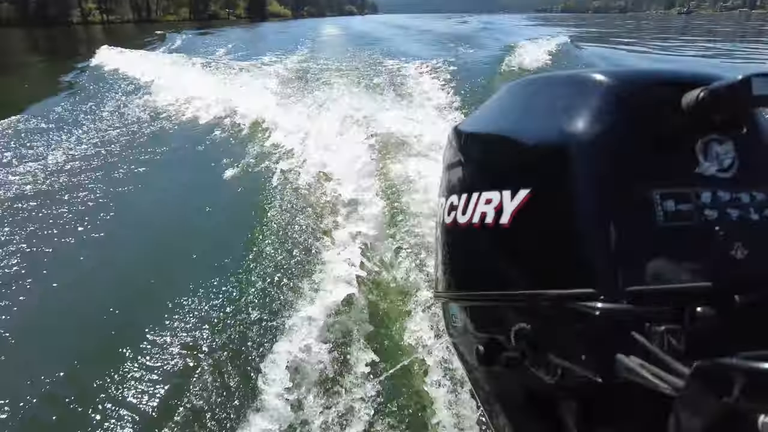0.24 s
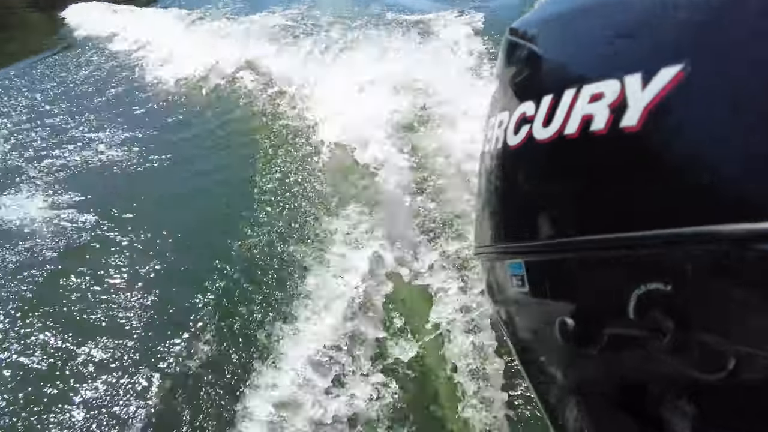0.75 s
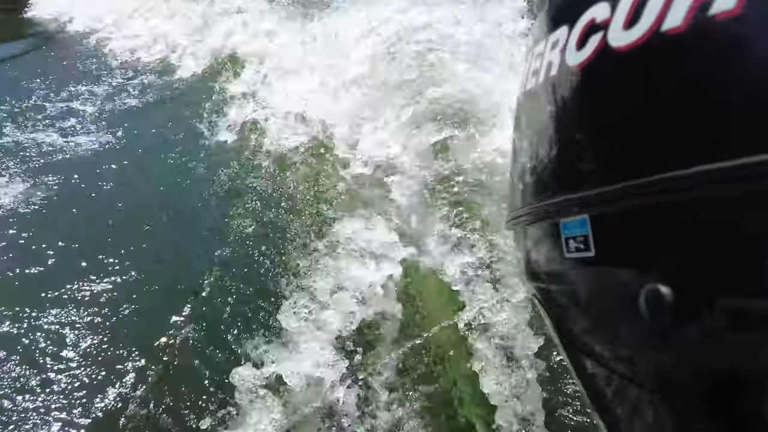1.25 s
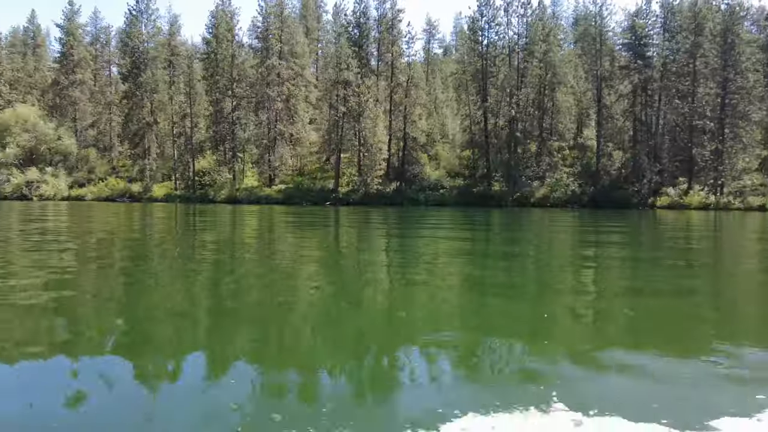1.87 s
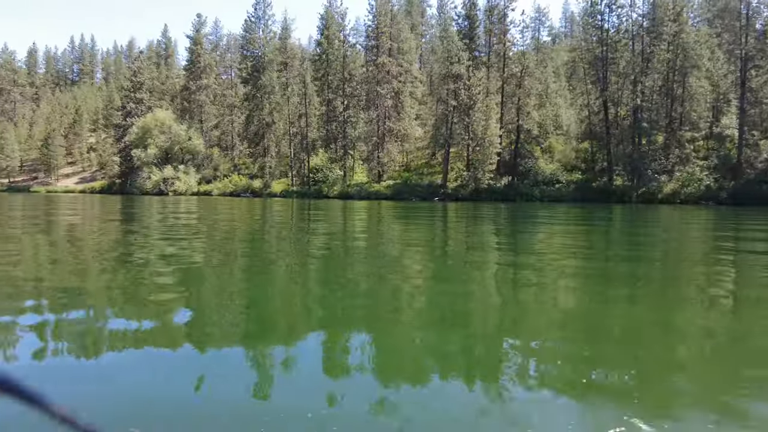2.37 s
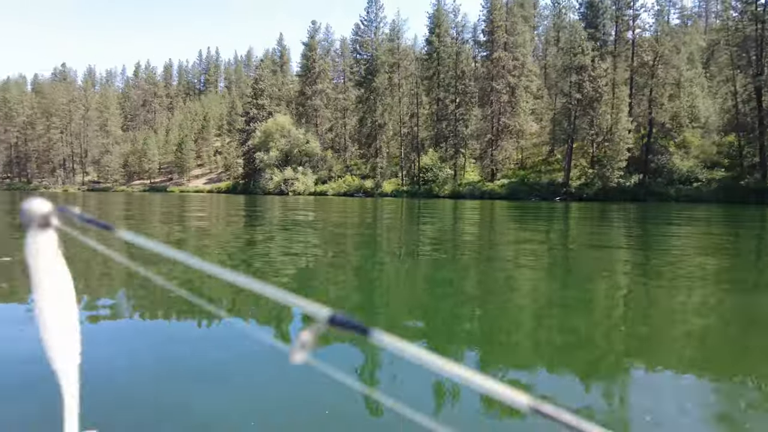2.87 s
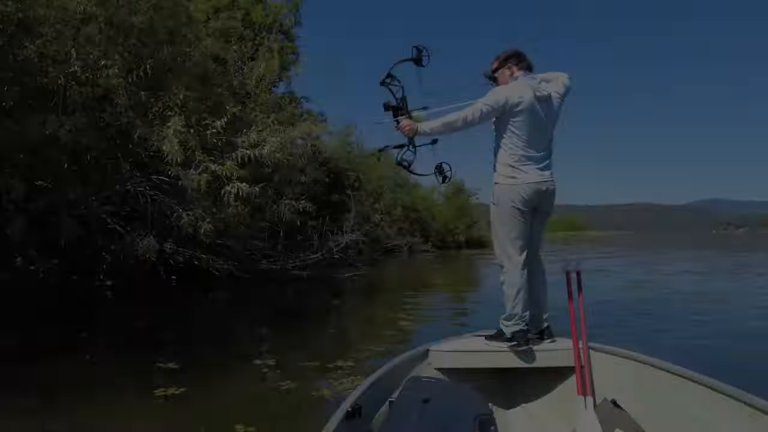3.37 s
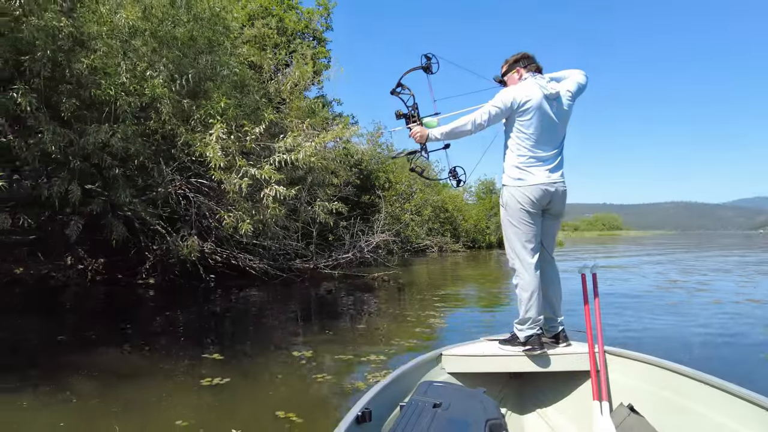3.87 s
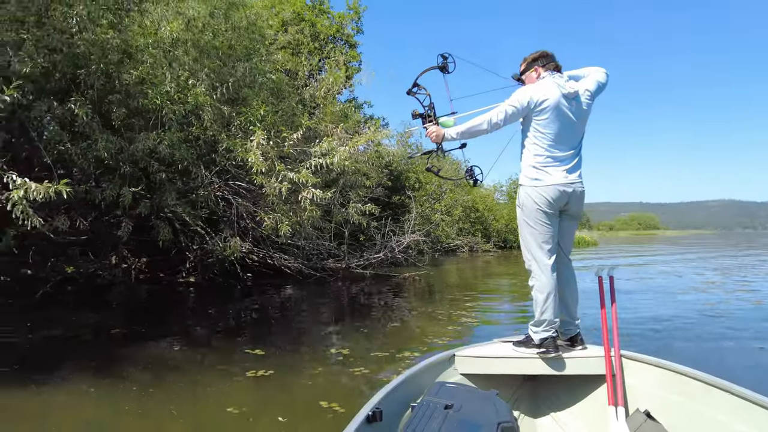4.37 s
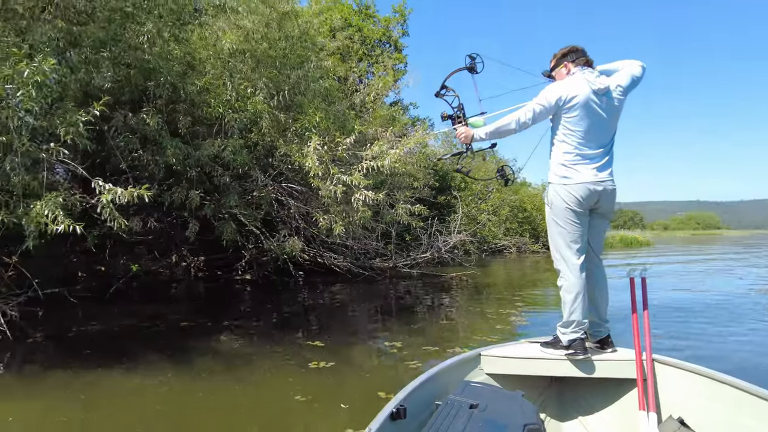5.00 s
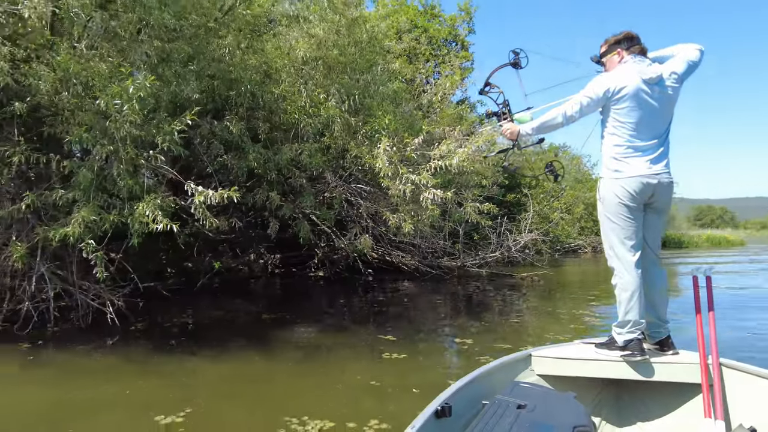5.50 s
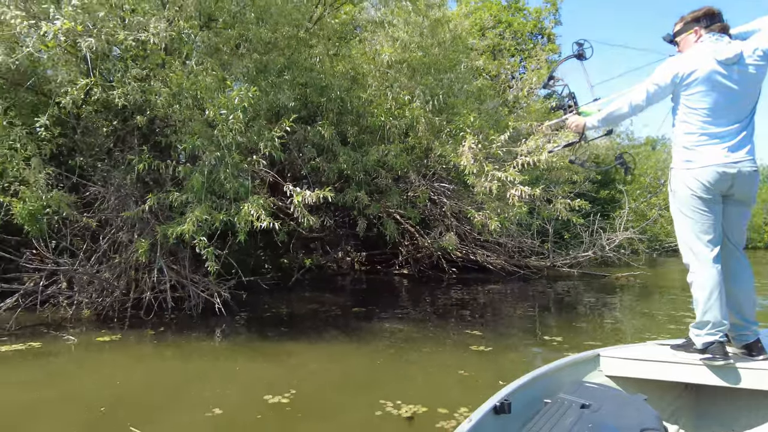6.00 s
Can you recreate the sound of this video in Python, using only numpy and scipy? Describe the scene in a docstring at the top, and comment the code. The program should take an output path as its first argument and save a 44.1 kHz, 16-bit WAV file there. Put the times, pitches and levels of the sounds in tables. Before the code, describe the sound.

A small outboard motor drones at speed over hissing spray, then cuts to a quiet lake with a brief creak and small ticks.

```python
"""A small four-stroke outboard runs at speed: a firing drone over exhaust roar, spray and a ringing cowl,
with waves thudding under the hull. It is heard close behind the cowl, then at 1.4 s from further forward.
At 3.3 s the sound is cut off, and after a blank instant comes a quiet lake. Something stiff creaks in
slips beside the microphone; gear ticks, someone shifts in the boat, wind puffs and a far motor hums.
Around 5 s an insect chirps faintly, and right at the end a bubble plops."""
import sys
import numpy as np
from scipy import signal
from scipy.fft import rfft, irfft, next_fast_len
from scipy.io import wavfile

SR = 44100
rng = np.random.default_rng(int(sys.argv[2]) if len(sys.argv) > 2 else 0)


def int16_out(signal):
    """Quantize to a 16-bit WAV file."""
    q = np.round(np.clip(np.atleast_2d(signal).T, -1, 1) * 32767)
    wavfile.write(sys.argv[1], SR, q.astype(np.int16))


N = 275524
TIME = np.arange(N) / SR

# How the drone moves, from behind the cowl and from further forward.
# Each row: time in seconds, firings per second, then the levels in dB of orders 1, 4, 6 and 7.
NEAR_FIRING = [(0.03, 68, -17.5, -19, -28.5, -59), (0.234, 69.3, -20, -17.5, -37, -45),
               (0.362, 69, -18, -17.5, -32, -43), (0.532, 68, -15.5, -19, -41, -44.5),
               (0.746, 67.9, -17.5, -20.5, -33.5, -42), (1.42, 67.0, -17, -19, -42, -36.5)]
FORWARD_FIRING = [(1.48, 71.07, -17.5, -23.5, -33.5, -51), (1.632, 71, -18, -25.5, -32, -67),
                  (1.844, 70.62, -20, -24, -30.5, -52), (3.25, 70.84, -20, -24.5, -32, -58)]
# The drone's timbre; the half orders come from the two unlike cylinders.
# Each row: order as a multiple of the firing rate, relative level in dB.
NEAR_ORDERS = [(.5, -33.5), (1, -2), (1.5, -20.5), (2, -5.5), (2.5, -21.5), (3, -10.5), (3.5, -13), (4, 5),
               (5, -12.5), (5.5, -23), (6, -11), (6.5, -22), (7, -23), (8, -28), (9, -31), (10, -28),
               (11, -29.5), (17, -32)]
FORWARD_ORDERS = [(.5, -32), (1, 0.5), (1.5, -19.5), (2, -6), (2.5, -25), (3, -10), (3.5, -16), (4, -2),
                  (5, -10), (5.5, -17), (6, -8), (6.5, -27.5), (7, -43.5), (8, -32.5), (9, -24.5),
                  (10, -22.5), (10.5, -25.5), (11.5, -26.5), (12, -25.5), (13, -22.5), (14, -23),
                  (15, -29.5)]

def firing_drone(firing, orders, pipe_orders, pipe_rad, wobble_db, upper_wobble_db):
    """The cylinders fire in turn, stacking clean orders; unlike firings make the upper ones waver."""
    phase = firing_phase(firing)
    _, *guide_db = in_time(firing)
    guides = [1, 4, 6, 7]
    swells_db = [db - dict(orders)[order] for order, db in zip(guides, guide_db)]
    swells_db.append(np.mean(swells_db[0]))   # from order 8 up, a steady offset
    out = 0
    for order, db in orders:
        place = np.interp(order, guides + [8], range(5))   # swell with the neighbouring guide orders
        db = db + sum(max(1 - abs(place - i), 0) * swell for i, swell in enumerate(swells_db))
        waver = np.clip((order - 1) / 3, 0, 1)
        # orders inside the exhaust resonance swing together, nearby ones against them;
        # above order 6 they scatter at random
        outside = not pipe_orders[0] <= order <= pipe_orders[1]
        lead = 1.8 if order == 1 else pipe_rad + np.pi * outside   # order 1: the hull shakes ahead
        lead += (order > 6) * rng.uniform(0, 2 * np.pi) + .1 * order ** .9 * waver * drift(5)
        db = db + wobble_db * waver * drift(12) + (order > 4) * upper_wobble_db * drift(2.7)
        out += np.sqrt(2) * from_db(db) * np.cos(order * phase + lead)
    return out


# The body of the roar. Each row: frequency in Hz, relative noise density in dB.
NEAR_ROAR = [(20, -16), (50, -7.5), (110, -2), (180, -0.5), (270, 2), (400, -3), (550, -8), (750, -6),
             (1000, -8.5), (1550, -10.5), (2000, -16.5), (3200, -26), (5000, -42.5)]
FORWARD_ROAR = [(20, 2), (50, 2.5), (110, -2.5), (180, -8.5), (270, 3), (400, -7.5), (550, -3), (800, -6),
                (1300, -7.5), (2000, -11.5), (3200, -20.5), (5000, -28.5)]

def exhaust_roar(puff, spectrum, level_db):
    """Exhaust and churned water fill the gaps between the orders, swelling with each firing."""
    return from_db(level_db) * coloured(white() * puff, spectrum, patchy_db=.42)


# The sizzle of spray and valves. Each row: frequency in Hz, relative noise density in dB.
NEAR_SPRAY = [(2000, -10), (3000, 2.5), (4000, 0.5), (5000, 2.5), (6200, 0.5), (7500, -9), (9000, -4),
              (10000, -11), (11000, -21.5), (12500, -26), (15800, -27.5)]
FORWARD_SPRAY = [(2000, -17), (3000, 0), (4000, -6), (5000, -2.5), (6200, -5), (7500, -5.5), (9000, -7.5),
                 (10000, -11.5), (11000, -16), (12500, -22), (15800, -30)]
# The cowl's bright rings. Each row: pitch in Hz, width in Hz, relative level in dB.
NEAR_RINGS = [(7470, 780, 13.5), (8500, 150, -1), (9070, 120, -6.5)]
FORWARD_RINGS = [(7240, 370, 7), (8970, 220, 2), (9900, 190, -6)]
# The treble rides up and down as the view of the wake and cowl shifts.
# Each row: time in seconds, spray level in dB, cowl gain in dB.
NEAR_TREBLE = [(0, -54.5, -69.5), (.6, -52, -65.5), (.88, -55, -65), (1.02, -57, -70), (1.27, -55, -69.5),
               (1.35, -49, -81), (1.46, -49, -81)]
FORWARD_TREBLE = [(1.44, -49, -65), (2.1, -49.5, -68), (2.4, -48, -76), (3.28, -50, -74)]

def spray_and_cowl(puff, spectrum, rings, treble):
    """Spray and valves hiss in time with the firings, and the valve gear sets the cowl ringing."""
    spray_db, cowl_db = in_time(treble)
    spray = coloured(white() * puff ** 2, spectrum, patchy_db=1.3)
    valve_gear = white() * puff
    cowl = sum(from_db(db) * rms_one(ring(valve_gear, hz, 2.2 / width)) for hz, width, db in rings)
    return from_db(spray_db) * spray + from_db(cowl_db) * cowl


def outboard_near():
    """The motor from close behind the cowl, with a strong fourth order and a clear pulse."""
    drone = firing_drone(NEAR_FIRING, NEAR_ORDERS, pipe_orders=(2, 5.5), pipe_rad=.6,
                         wobble_db=1, upper_wobble_db=3)
    puff = firing_puff(NEAR_FIRING, depth=.13)
    roar = exhaust_roar(puff, NEAR_ROAR, level_db=-29)
    return drone + roar + spray_and_cowl(puff, NEAR_SPRAY, NEAR_RINGS, NEAR_TREBLE)


def outboard_forward():
    """The same motor from further forward, with a smoother pulse and more spray."""
    drone = firing_drone(FORWARD_FIRING, FORWARD_ORDERS, pipe_orders=(2.5, 5.5), pipe_rad=2.9,
                         wobble_db=1.5, upper_wobble_db=.68)
    puff = firing_puff(FORWARD_FIRING, depth=.052)
    roar = exhaust_roar(puff, FORWARD_ROAR, level_db=-31.5)
    return drone + roar + spray_and_cowl(puff, FORWARD_SPRAY, FORWARD_RINGS, FORWARD_TREBLE)


# Waves under the hull. Each row: start in seconds, level in dB.
WAVE_BUMPS = [(0.049, -38), (0.219, -30), (1.599, -38.5), (2.109, -19), (2.519, -37), (2.738, -22),
              (2.839, -36)]

def hull_thuds():
    """Each wave knocks a soft, deep thud out of the hull."""
    starts, db = np.transpose(WAVE_BUMPS)
    return ring(clicks_at(starts, db), hz=26, t60=.15)


# The creak's stutter. Each row: start in seconds, strength of the ring in dB, strength of the jolt in dB.
SLIPS = [(3.2918, -30, -37), (3.3039, -45, -57), (3.3124, -50, -58), (3.3228, -30, -44),
         (3.3425, -36, -39.5), (3.365, -31, -41.5), (3.3879, -30, -36.5), (3.431, -31, -35.5),
         (3.5133, -26.5, -34.5), (3.5409, -37.5, -38)]
# The stiff part's voice, then the housing's low and upper knock.
# Each row: pitch in Hz, gain in dB, seconds to die away by 60 dB.
CREAK_MODES = [(2370, 2.5, 0.005), (3200, -23, 0.0028), (1530, -9, 0.0027)]
HOUSING_MODES = [(97.7, 10.5, 0.0205), (440, 13.5, 0.0043)]
# A thin squeak along the slips. Each row: time in seconds, pitch in Hz, level in dB.
SQUEAK = [(3.292, 4450, -71), (3.40, 4320, -75), (3.48, 4330, -85)]

def creak():
    """Each slip rings the stiff part, scrapes on briefly and jolts the housing; a squeak runs along."""
    starts, ring_db, jolt_db = np.transpose(SLIPS)
    scrape_decay = from_db(-60 / (.018 * SR))   # gone in 18 ms
    scrape = signal.lfilter([1], [1, -scrape_decay], clicks_at(starts, ring_db - 33)) * white()
    out = 0
    for hz, db, t60 in CREAK_MODES:
        slips = clicks_at(starts, ring_db + db + rng.normal(0, 1.2, len(starts)))
        out += ring(slips + from_db(db) * scrape, hz, t60)
    (low_hz, low_db, low_t60), (upper_hz, upper_db, upper_t60) = HOUSING_MODES
    out += ring(clicks_at(starts, jolt_db + upper_db), upper_hz, upper_t60)
    out -= ring(clicks_at(starts + .0014, jolt_db + low_db), low_hz, low_t60)   # the swing back
    blunt_contact = butter(out, 6, 4200)
    return blunt_contact + tone(SQUEAK) * from_db(2.1 * drift(60))


# Small ticks of gear. Each row: start in seconds, gain in dB, pitch in Hz, gain of the broad snap in dB.
GEAR_TICKS = [(3.3430, -52, 5500, -1), (3.438, -51, 6000, -12), (3.5322, -58, 6000, -6),
              (3.5985, -54, 8500, -10), (4.392, -41, 3000, 5), (4.4870, -56, 4500, -6),
              (5.4020, -42, 2940, 0), (5.441, -55, 8000, -8), (5.4895, -53, 2740, 1),
              (5.5058, -50, 2370, -15), (5.577, -54, 2310, -18), (5.7276, -46.5, 2730, -18.5),
              (5.8531, -56, 2670, -10), (6.1973, -51, 2620, -12)]

def gear_ticks():
    """Gear touches in tiny snaps: a short ring with a flick of broad noise."""
    out, size = np.zeros(N), 400
    fade = np.exp(-np.arange(size) / (.00032 * SR))
    for start, db, hz, snap_db in GEAR_TICKS:
        contact = rng.standard_normal(size) * fade
        contact[0] = 2.1   # the first touch is the hardest
        body = ring(contact, hz, 8.9 / hz)
        tick = body / abs(body).max() + .5 * from_db(snap_db) * contact
        at = round(start * SR)
        out[at:at + size] += from_db(db) * tick
    return butter(out, 3, [2300, 11000], "band")


# The plop's curve. Each row: time in seconds, pitch in Hz, level in dB.
PLOP = [(6.199, 1150, -78), (6.203, 1180, -50), (6.212, 1540, -61), (6.222, 1700, -72), (6.236, 1350, -63),
        (6.242, 1300, -80)]

def bubble():
    """A bubble rings for an instant, its pitch flicking up and falling back."""
    return tone(PLOP)


# Someone shifts in the boat. Each row: time of the peak in seconds, peak level in dB.
STIRS = [(3.30, -60.5), (3.56, -71.5), (4.17, -78), (4.5, -78), (4.9, -77), (5.45, -72), (5.72, -77),
         (5.88, -70), (6.2, -80)]
STIR_CALM_DB = -79.5
# The rustle's dry colour. Each row: frequency in Hz, relative noise density in dB.
RUSTLE_COLOUR = [(600, -14), (1500, -32), (2400, 2), (2700, 1), (3300, -7), (4000, -9), (5000, -10.5),
                 (6500, -13.5), (8500, -17), (12500, -26), (13500, -31), (15500, -31)]

def rustle(stir_db):
    """Shifting about makes a rough, flickering rustle."""
    rough = white() * from_db(1.3 * drift(150))
    return from_db(stir_db) * coloured(rough, RUSTLE_COLOUR, patchy_db=2.1)


def crackle(stir_db, grains_per_s=120):
    """Sparse grains of uneven size ring briefly, just under the rustle they come with."""
    sizes = from_db(2.7 * np.minimum(rng.exponential(1, N), 4)) * rng.choice([-1, 1], N)
    grains = sizes * (rng.random(N) < grains_per_s / SR)
    voice = rng.integers(0, 4, N)
    rings = sum(ring(grains * (voice == i), hz, .006) for i, hz in enumerate([2100, 2380, 2750, 3100]))
    return from_db(stir_db - 3.5) * rms_one(rings)


# Puffs of wind. Each row: time of the peak in seconds, peak level in dB.
GUSTS = [(3.34, -47), (3.52, -52), (3.7, -59), (5.56, -57)]

def wind():
    """Gusts buffet the microphone with a very low rumble."""
    wind_db = bouts(GUSTS, calm_db=-63.5, rise_db_per_s=102, fall_db_per_s=85)
    return from_db(wind_db) * rms_one(butter(white(), 2, [12, 50], "band"))


# The dark bed of lake air. Each row: frequency in Hz, relative noise density in dB.
AIR_COLOUR = [(20, -19), (40, -14), (65, -9), (100, -11), (200, -10.5), (400, -12.5), (650, -15),
              (950, -16), (1200, -24), (1700, -22.5), (2400, -32.5), (3300, -48), (4500, -54)]

def still_air(stir_db, sag_db_per_s=.68):
    """A soft wash that sinks slowly and lifts a little with the rustle."""
    air_db = -56.5 - sag_db_per_s * (TIME - LAKE_S) + .033 * (stir_db - STIR_CALM_DB)
    return from_db(air_db) * coloured(white(), AIR_COLOUR, patchy_db=1.3)


# The far motor's tones. Each row: pitch in Hz, base level in dB.
HUM_TONES = [(102.3, -66.5), (204.6, -78), (236.9, -78)]
# It draws nearer. Each row: time in seconds, gain in dB.
HUM_APPROACH = [(3.29, -3), (4.5, -5), (5.2, 2.5), (6.25, 1)]

def far_motor():
    """A distant motor hums, each tone wavering in level and phase."""
    approach_db, = in_time(HUM_APPROACH)
    out = 0
    for hz, db in HUM_TONES:
        gain = np.sqrt(2) * from_db(db + approach_db + 2 * drift(5.4))
        out += gain * np.sin(2 * np.pi * hz * TIME + .84 * drift(2))
    return out


def insect(start_s=4.59, end_s=5.3, chirps_per_s=12.8):
    """A far insect chirps: a narrow hiss in short throbs."""
    singing = (TIME > start_s) & (TIME < end_s)
    throb = np.maximum(np.cos(2 * np.pi * chirps_per_s * (TIME - start_s)), 0)
    voice = rms_one(ring(white(), hz=3800, t60=.008))
    return from_db(-82 + 1.5 * drift(3.1)) * singing * throb * voice


def microphone_hiss():
    """The microphone's own faint, steady noise."""
    return from_db(-95) * rms_one(butter(white(), 8, 13000))


def firing_phase(firing):
    """Phase in radians, one turn per firing."""
    return 2 * np.pi * np.cumsum(in_time(firing)[0]) / SR


def firing_puff(firing, depth):
    """A gain that swells with each firing, every other one slightly stronger."""
    phase = firing_phase(firing)
    return 1 + depth * np.cos(phase) + .029 * np.cos(phase / 2)


def from_db(db):
    """Decibels to gain."""
    return 10 ** (np.asarray(db) / 20)


def rms_one(x):
    """Scale to rms 1."""
    return x / np.sqrt(np.mean(x ** 2) + 1e-20)


def white():
    """Fresh white noise for the whole scene."""
    return rng.standard_normal(N)


def butter(x, order, hz, kind="low"):
    """A smooth filter, low-pass by default."""
    return signal.sosfilt(signal.butter(order, hz, kind, fs=SR, output="sos"), x)


def in_time(rows):
    """The columns after a table's time column, drawn out to every sample."""
    times, *columns = np.transpose(rows)
    return [np.interp(TIME, times, column) for column in columns]


def drift(rate):
    """A smooth random wander of spread 1, changing about rate times a second."""
    pole = np.exp(-80 * np.pi * rate / SR)   # one step per 40 samples
    slow = signal.lfilter([1], [1, -2 * pole, pole * pole], rng.standard_normal(N // 40 + 2002))[2000:]
    return np.interp(np.arange(N) / 40, np.arange(len(slow)), rms_one(slow))


def ring(drive, hz, t60):
    """A resonator: a unit click starts a sine of height 1 that falls 60 dB in t60 seconds."""
    decay, step = from_db(-60 / (t60 * SR)), 2 * np.pi * hz / SR
    return signal.lfilter([np.sin(step)], [1, -2 * decay * np.cos(step), decay * decay], drive + 1e-18)


def clicks_at(times, db):
    """One click per event."""
    out = np.zeros(N)
    out[np.round(times * SR).astype(int)] = from_db(db)
    return out


def coloured(source, spectrum, patchy_db):
    """The source shaped to a spectrum in overlapping octave bands, each flickering; rms 1."""
    size = next_fast_len(N)
    octave = np.log2(np.maximum(np.arange(size // 2 + 1) * SR / size, 10))
    hz, db = np.transpose(spectrum)
    shaped = rfft(source, size) * from_db(np.interp(octave, np.log2(hz), db, left=-90, right=-90))
    together, out = drift(4.7), 0
    for centre in np.arange(np.floor(np.log2(hz[0])), np.log2(hz[-1]) + 1):
        band = irfft(shaped * np.clip(1 - abs(octave - centre), 0, 1), size)[:N]
        out += band * from_db(patchy_db * (.35 * together + drift(25)))
    return rms_one(out)


def tone(rows):
    """A sine that follows rows of seconds, Hz and dB, silent outside them."""
    hz, db = in_time(rows)
    inside = (TIME > rows[0][0]) & (TIME < rows[-1][0])
    return inside * np.sqrt(2) * from_db(db) * np.sin(2 * np.pi * np.cumsum(hz) / SR)


def bouts(events, calm_db, rise_db_per_s, fall_db_per_s):
    """Level in dB: each bout climbs to its peak and dies away over a calm level."""
    power = from_db(2 * calm_db)
    for peak_s, db in events:
        below_peak_db = np.maximum(rise_db_per_s * (peak_s - TIME), fall_db_per_s * (TIME - peak_s))
        power = power + from_db(2 * (db - below_peak_db))
    return 10 * np.log10(power)


FORWARD_S, CROSSFADE_S = 1.445, .018
STOP_S, LAKE_S, CUT_FADE_S = 3.282, 3.291, .003

def scene():
    """The outboard from two positions, a blank instant, then the lake."""
    forward = np.clip((TIME - FORWARD_S) / CROSSFADE_S + .5, 0, 1)
    boat = (1 - forward) * outboard_near() + forward * outboard_forward() + hull_thuds()
    stir_db = bouts(STIRS, STIR_CALM_DB, rise_db_per_s=87, fall_db_per_s=70)
    close_by = creak() + gear_ticks() + bubble() + rustle(stir_db) + crackle(stir_db)
    background = wind() + still_air(stir_db) + far_motor() + insect() + microphone_hiss()
    boat_fader = np.clip((STOP_S - TIME) / CUT_FADE_S, 0, 1)
    lake_fader = np.clip((TIME - LAKE_S) / CUT_FADE_S, 0, 1)
    return (boat_fader * boat + lake_fader * (close_by + background))[None]


def record(dry):
    """A steep low-pass takes off the very top, 60 dB down at 15.9 kHz."""
    return signal.sosfilt(signal.cheby2(24, 60, 15900, fs=SR, output="sos"), dry)


dry = scene()
out = record(dry)
int16_out(out)
```